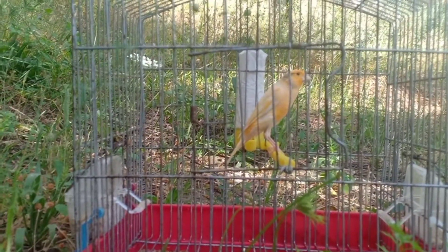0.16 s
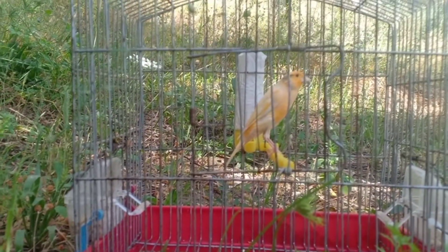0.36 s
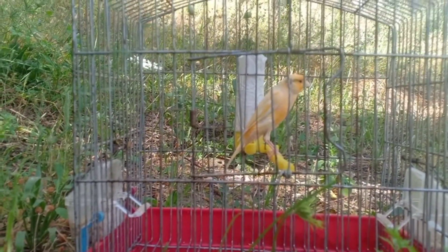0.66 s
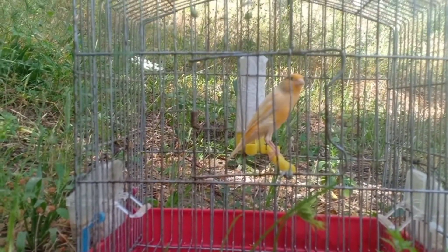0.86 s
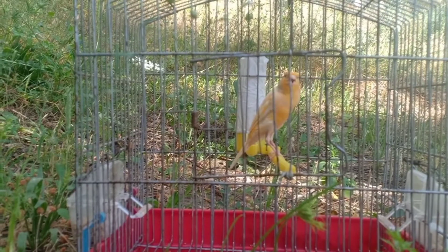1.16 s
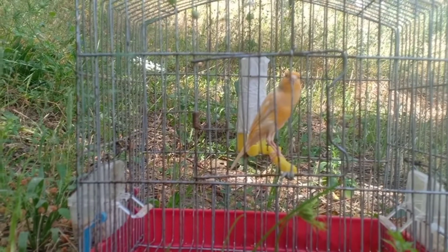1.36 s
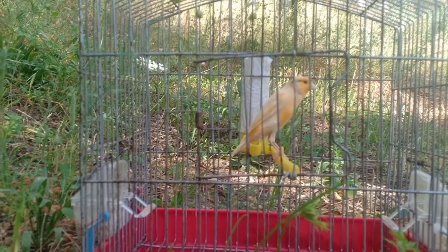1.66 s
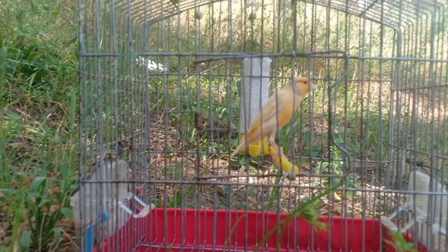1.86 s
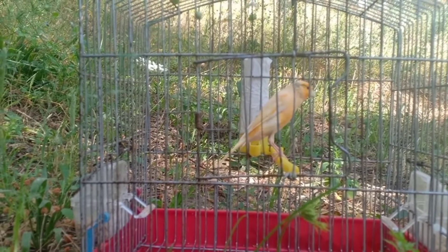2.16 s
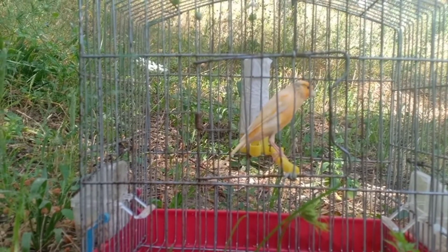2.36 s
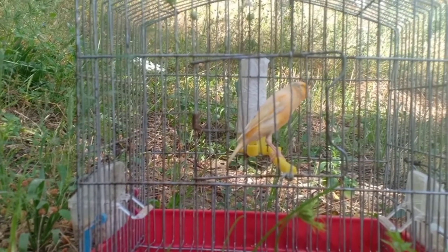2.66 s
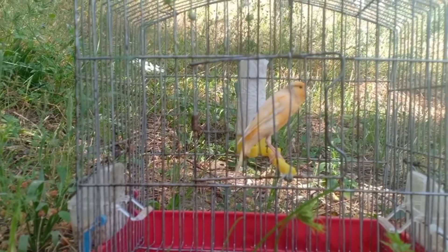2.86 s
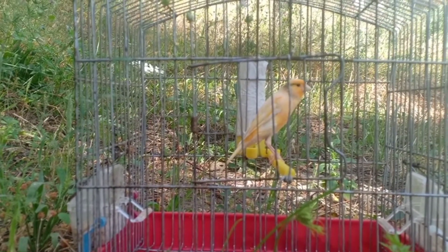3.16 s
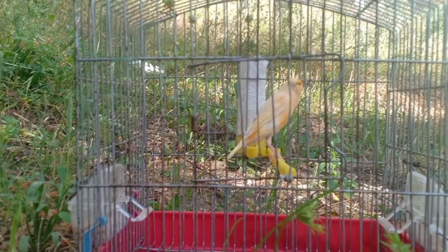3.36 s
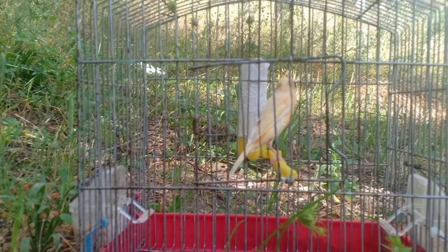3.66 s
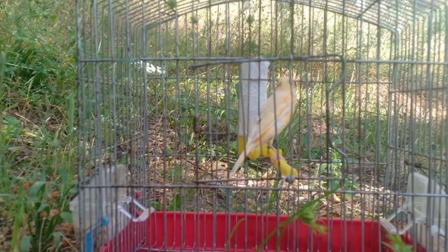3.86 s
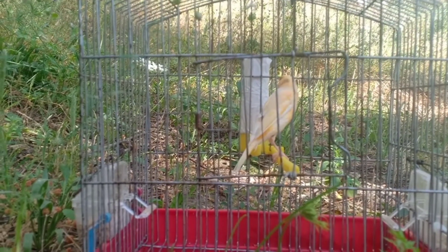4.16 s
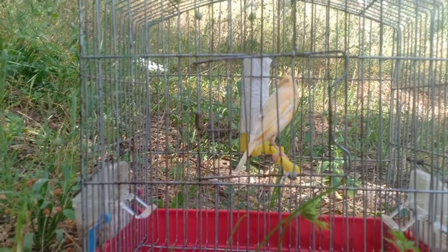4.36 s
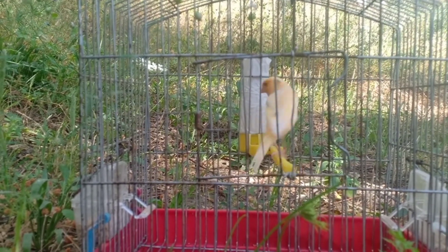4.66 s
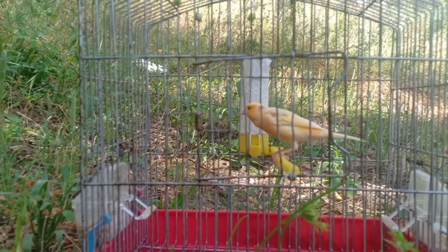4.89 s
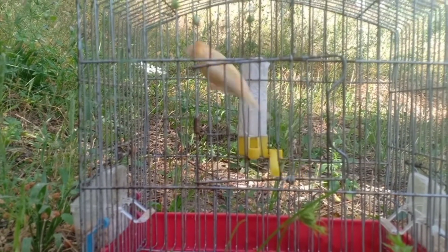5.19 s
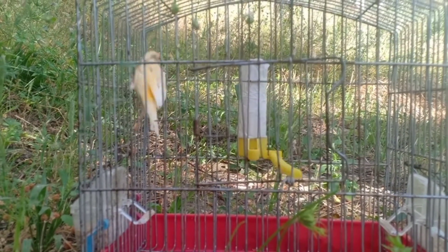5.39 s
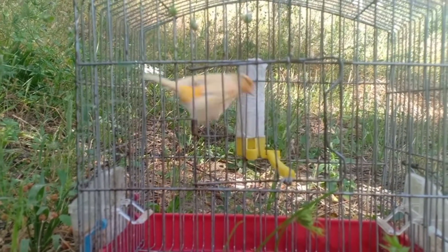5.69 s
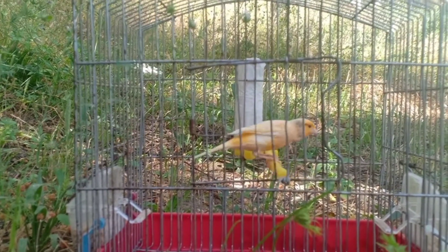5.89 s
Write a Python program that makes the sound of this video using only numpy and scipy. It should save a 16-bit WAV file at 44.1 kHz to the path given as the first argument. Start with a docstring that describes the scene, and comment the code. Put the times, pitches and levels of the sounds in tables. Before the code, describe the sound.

A caged canary gives three loud rising whistled calls outdoors while fainter wild birds chirp behind; late on it flutters, ringing the wire cage softly.

```python
"""A caged canary in a shady garden gives three rising calls, each going from a rasp to a clean whistle.
Each call is a gliding stack of harmonics plus throat hiss; the tray and the feeder throw short echoes.
Wild songbirds further off are bending near-sine tones blurred by echoes from the trees.
In the second half the canary flutters: shaped noise makes its feet ring the cage, its wings and its claws.
Under it all lie a faint outdoor rumble and a wash of far birdsong, also shaped noise."""
import sys
import numpy as np
from scipy import signal
from scipy.fft import rfft, irfft
from scipy.io import wavfile

SR = 44100
rng = np.random.default_rng(int(sys.argv[2]) if len(sys.argv) > 2 else 0)


def bounce(signal):
    """Save signal as a 16-bit WAV file at the path given by the first command-line argument."""
    frames = np.transpose(np.atleast_2d(signal))
    limited = np.clip(frames, -1, 1)
    pcm = np.round(limited * 32767).astype(np.int16)
    wavfile.write(sys.argv[1], SR, pcm)


N = 265923
TIME = np.arange(N) / SR
TOP_HZ = 15650

# Steady rumble and air: [f/Hz, relative level/dB]
AIR_SPECTRUM = [(12, -33.5), (20, -1.5), (32, -25.5), (49, -14), (80, -1.5), (153, -13), (238, -14),
                (298, -14.5), (549, -16), (1450, -23.5), (2920, -22), (3170, -30), (4550, -35.5),
                (5850, -35), (15500, -37.5)]
AIR_DB = -62.5
# Wash of far birdsong: [f/Hz, relative level/dB]
CHORUS_SPECTRUM = [(1500, -5), (2400, 2.5), (3500, -5.5), (5300, -0.5), (6800, -2.5), (8000, -9.5),
                   (11000, -36)]
# How loud that wash is over time, before a small sway: [t/s, level/dB]
CHORUS_LEVELS = [(0, -70), (.9, -73.5), (1.5, -69), (2.7, -67.5), (3.3, -69), (3.8, -76), (4.3, -74.5),
                 (6, -68)]
# Soft swells of low rumble: [t of crest/s, half width/s, level/dB]
RUMBLE_SWELLS = [(.38, 0.21, -62), (2.38, 0.19, -62.5)]
# Tone colour of the swells: [f/Hz, relative level/dB]
SWELL_SPECTRUM = [(80, -16), (200, 0), (450, -0.5), (800, -9.5), (1600, -29), (4000, -50)]

# Wild birds' notes, and at 0.16 s the echo of the first; level before the cut of WILD_DB:
# [t/s, length/s, start f/Hz, middle f/Hz, end f/Hz, level/dB, tone type]
WILD_SOUNDS = [(0.112, 0.052, 3860, 3020, 2370, -48.5, "chirp"),
               (0.16, 0.071, 2770, 2540, 2460, -52, "chirp"),
               (0.194, 0.25, 3720, 4690, 5150, -68.5, "whistle"),
               (0.273, 0.26, 2030, 2606, 3660, -60, "whistle"),
               (0.438, 0.026, 3000, 2730, 2210, -41.5, "chirp"),
               (0.468, 0.069, 2480, 2766, 2553, -54.5, "chirp"),
               (0.559, 0.052, 6150, 5160, 5500, -58, "twitter"),
               (0.701, 0.059, 6600, 4810, 3620, -58, "twitter"),
               (0.779, .028, 2220, 2570, 3060, -50, "chirp"),
               (0.923, .048, 3435, 2860, 2460, -48.5, "chirp"),
               (1.414, 0.082, 2650, 2435, 2700, -50, "chirp"),
               (1.566, 0.055, 2245, 2094, 1890, -61, "warble"),
               (1.576, 0.077, 4980, 4900, 4150, -56.5, "twitter"),
               (1.815, 0.039, 2420, 2880, 3130, -46.5, "chirp"),
               (1.94, 0.078, 4360, 4543, 4420, -47, "buzz"),
               (1.998, .016, 4960, 3210, 2530, -47.5, "chirp"),
               (2.195, .066, 2678, 2624, 2240, -44, "warble"),
               (2.275, 0.043, 2216, 2675, 2750, -45.5, "warble"),
               (2.352, 0.043, 2285, 2183, 2024, -46, "warble"),
               (2.438, 0.058, 3420, 3350, 3246, -53, "warble"),
               (2.467, 0.061, 3230, 3171, 2910, -45, "warble"),
               (2.712, 0.11, 3920, 3524, 3420, -66.5, "warble"),
               (4.958, .16, 1680, 1887, 1930, -54, "whistle"),
               (5.267, 0.177, 2434, 2407, 2390, -45, "whistle"),
               (5.605, .058, 2470, 2412, 2290, -46, "whistle"),
               (5.661, .13, 2390, 2270, 2380, -49, "whistle")]
# Tone types of the wild birds' sounds, by name: [left minus right level/dB, rasp 0-1]
WILD_TONES = {"chirp": (8, 0.98), "warble": (5, .28), "twitter": (-10, 1), "whistle": (7, 0.049),
              "buzz": (-2.5, 0.59)}
# High upward flicks, level before the cut of WILD_DB: [t/s, level/dB]
FLICK_TIMES = [(1.692, -57.5), (2.078, -57.5), (2.607, -59.5)]
FLICK_BEND_HZ, FLICK_S = (5200, 6300, 6680), 0.067  # start, middle and end pitch; length
# Arched syllables, level before the cut of WILD_DB: [t/s, level/dB]
ARCH_TIMES = [(4.391, -58), (4.565, -54), (4.742, -53), (4.94, -54), (5.156, -52.5)]
# The arch climbs from a low start to a sharp peak and drops to a lower end
ARCH_START_HZ, ARCH_PEAK_HZ, ARCH_END_HZ = 4064, 6800, 3350
ARCH_S, ARCH_PEAK_S, ARCH_WIDTH_S = 0.12, .054, 0.017
ARCH_PEAK_DIP_DB = -14.5  # the voice thins at the top
ARCH_HOOK_HZ, ARCH_HOOK_S = 376, .052  # the tail hooks up by this much, around this long after the peak
WILD_DB = -6.5  # applied to all wild birds and their echoes

# The canary's three calls, each: [t/s, f/Hz, level/dB]
FIRST_CALL = [(1.13, 994, -55), (1.158, 1314, -20), (1.168, 1442, -32), (1.194, 1567, -20),
              (1.234, 1944, -16), (1.298, 2336, -26), (1.324, 2430, -17.5), (1.35, 2753, -25),
              (1.408, 2974, -24), (1.444, 3394, -11.5), (1.458, 3474, -24.5)]
SECOND_CALL = [(2.884, 1185, -51), (2.908, 1330, -25.5), (2.93, 1514, -28.5), (2.948, 1505, -25.5),
               (2.964, 1767, -24.5), (2.994, 1968, -19.5), (3.038, 2315, -27), (3.052, 2400, -22),
               (3.07, 2664, -23), (3.138, 2952, -22), (3.166, 3012, -26), (3.175, 3003, -25.5)]
THIRD_CALL = [(5.213, 1063, -56.5), (5.225, 1158, -35), (5.239, 1400, -26), (5.251, 1484, -26),
              (5.269, 1554, -23), (5.319, 2012, -24), (5.371, 2390, -24), (5.419, 2760, -28),
              (5.463, 2928, -25.5), (5.499, 3165, -20), (5.515, 3205, -31.5), (5.524, 3240, -54)]
# Direct sound and close echoes for each pose of the bird: [left delay/ms, right delay/ms, left gain, right gain]
FIRST_PATHS = [(0, -.03, 1, 1), (.46, .35, .12, .09), (1.78, 1.81, .13, .13), (3.13, 3.12, .1, .1)]
SECOND_PATHS = [(0.0, 0.032, 1.0, 0.98), (0.46, 0.566, 0.21, 0.29), (0.86, 0.68, 0.2, 0.2),
                (1.85, 1.86, 0.32, 0.21)]
THIRD_PATHS = [(0.0, -0.049, 0.88, 1), (0.468, 0.296, 0.49, 0.28), (0.948, 1.03, 0.19, 0.12),
               (1.53, 1.483, 0.068, 0.4)]
# Strength of the first four harmonics from the syrinx, the bird's voice organ: [relative level/dB]
SYRINX_DB = [2.5, -1, -14.5, -5.5]
# How throat and beak pass those harmonics: [f/Hz, relative level/dB]
THROAT_FILTER = [(1100, -43.5), (1500, -31.5), (2080, -9.5), (2400, -21.5), (2750, -11), (3400, -1.5),
                 (4000, 2.5), (4500, -4.5), (5300, -2), (6000, -11), (7000, -29.5), (9000, -40)]
# Hiss of air in the throat: [f/Hz, relative level/dB]
THROAT_HISS = [(1100, -25.5), (2200, -12), (3300, -1), (5400, -2.5), (6300, -9), (7500, -23.5),
               (10000, -40.5)]
# Thin bright edge of the upper harmonics: [f/Hz, relative level/dB]
BRIGHT_EDGE = [(6000, -29), (7200, -11), (8500, -19.5), (10000, -22), (11400, -1.5), (12600, -17),
               (14000, -3.5), (15300, -2), (16000, -10), (17000, -91.5)]
# The tone builds up out of the hiss and stops abruptly
CALL_ATTACK_S, CALL_RELEASE_S = .018, .006
PURE_HZ, OCTAVE_FADE_LIMIT_DB = 2801, 28  # above this pitch the octave fades, by no more than this

# The canary's feet on perch and wires: [t/s, level/dB, time to ring down by 60 dB/s]
FOOT_LANDINGS = [(3.695, -60, 0.6), (4.892, -57.5, 0.99), (5.33, -54, 0.97), (5.46, -54.5, 1),
                 (5.608, -59.5, 1), (5.907, -51.5, 0.68)]
# What the cage rings with: [f/Hz, width/Hz, relative level/dB]
CAGE_RINGS = [(351, 22, 1), (401, 29, -2), (439, 39, 1.5), (517, 21, -0.5), (713.6, 38, -6.5),
              (797, 76, -8), (1246, 73, -9.5), (1790, 650, -14), (2625, 680, -29)]
# Wing flurries: [t/s, length/s, level/dB]
WING_FLURRIES = [(4.882, 0.038, -61), (5.308, 0.33, -57.5), (5.779, 0.074, -53), (5.904, 0.14, -63.5)]
# Rustle of the feathers: [f/Hz, relative level/dB]
FEATHER_SPECTRUM = [(120, -7), (400, 4), (1000, 0), (2200, 5.5), (5000, -5), (9000, -22), (14500, -12)]
# Claws tapping the bars: [t/s, level/dB]
CLAW_TAPS = [(3.695, -64), (4.89, -62), (5.814, -49), (5.833, -37), (5.837, -50), (5.91, -51)]
# Tone colour of the claws: [f/Hz, relative level/dB]
CLAW_SPECTRUM = [(150, 2), (900, -3), (2300, 0), (4500, -3), (7000, -16), (10000, -24), (15000, -19)]
# Dull knock of the tray: [f/Hz, relative level/dB]
THUMP_SPECTRUM = [(70, -20), (170, -2), (300, -7), (900, -20), (3000, -52)]
THUMP_AT_S, THUMP_DB, THUMP_T60_S = 5.815, -51.5, 0.21


def undb(db):
    """Turn decibels into gain."""
    return 10 ** (np.asarray(db) / 20)


def unit(x):
    """Scale to an rms (average strength) of 1."""
    return x / np.sqrt(np.mean(x ** 2))


def response(points, hz):
    """Read the gain at hz from a list of frequency and decibel points."""
    f, db = np.transpose(points)
    return undb(np.interp(np.log(hz + 1), np.log(f), db))


def noise(gain, size, apart=0.37):
    """Stereo noise shaped by gain(Hz); the two sides differ less in the bass."""
    hz = np.fft.rfftfreq(size, 1 / SR)
    mid, side = rfft(rng.standard_normal((2, size))) * gain(hz)
    side = side * apart * response([(60, -14.5), (600, 0.0)], hz)
    return unit(irfft(np.array([mid + side, mid - side]), size))


def coloured_noise(points, size, apart=0.37):
    """Stereo noise whose spectrum follows a table of points."""
    return noise(lambda hz: response(points, hz), size, apart)


def wobble(rate_hz, size):
    """Smooth random motion of spread 1, mostly slower than rate_hz."""
    hz = np.fft.rfftfreq(size, 1 / SR)
    return unit(irfft(rfft(rng.standard_normal(size)) / (1 + (hz / rate_hz) ** 4), size))


def decay(t, t60):
    """Fade that falls by 60 dB in t60 seconds."""
    return np.exp(-np.log(1000) * t / t60)


def left_right(db):
    """Two gains that make the left side louder than the right by db."""
    return undb(np.array([[db], [-db]]) / 2)


def add(track, start, sound):
    """Mix a sound into the track at its start time."""
    i = max(int(start * SR), 0)
    track[:, i:i + sound.shape[-1]] += sound[..., :N - i]


def garden(x, t60, wet_db):
    """Blur a sound with a dying tail of many small echoes, different at each ear."""
    t = np.arange(int(.8 * SR)) / SR
    tail = rng.standard_normal((2, len(t))) * decay(t, t60) * (t > .004)
    tail /= np.sqrt(np.sum(tail ** 2, axis=1, keepdims=True))
    mono = x.mean(axis=0)[None]
    return undb(wet_db) * signal.fftconvolve(mono, tail, axes=1)[:, :N]


def outdoors():
    """Low rumble and air that sway slightly, with a wash of far birdsong, all as shaped noise."""
    air_db = AIR_DB + .7 * wobble(3, N)
    air = coloured_noise(AIR_SPECTRUM, N, apart=0.82) * undb(air_db)
    chorus_db = np.interp(TIME, *np.transpose(CHORUS_LEVELS)) + 0.86 * wobble(8, N)
    chorus = coloured_noise(CHORUS_SPECTRUM, N, apart=0.76) * undb(chorus_db)
    return air + chorus


def swells():
    """Low rumbling noise rises softly and sinks again."""
    level = sum(undb(db) * np.exp(-((TIME - crest) / width) ** 2) for crest, width, db in RUMBLE_SWELLS)
    return level * coloured_noise(SWELL_SPECTRUM, N, apart=0.28)


def whistle(hz, rasp):
    """A near-sine bird tone whose pitch and strength shake with the rasp."""
    shaky_hz = hz * (1 + .06 * rasp * wobble(150, len(hz)))
    phase = 2 * np.pi * np.cumsum(shaky_hz) / SR
    return np.sqrt(2) * np.sin(phase) * (1 + .5 * rasp * wobble(140, len(hz)))


def bent_tone(length, bend, db, tone_type):
    """One tone that swells and fades while its pitch bends through start, middle and end."""
    pan_db, rasp = WILD_TONES[tone_type]
    u = np.linspace(0, 1, int(length * SR))
    hz = np.polyval(np.polyfit([0, .5, 1], bend, 2), u)
    swell = np.abs(np.sin(np.pi * u)) ** 0.48
    return whistle(hz, rasp) * swell * undb(db) * left_right(pan_db)


def arch():
    """One syllable whose pitch climbs to a sharp peak, where it thins, and drops to a weaker, hooked tail."""
    t = np.arange(0, ARCH_S, 1 / SR) - ARCH_PEAK_S
    height = np.exp(-np.abs(t / ARCH_WIDTH_S) ** 1.3)
    hook = 1 - 1 / (1 + (t / ARCH_HOOK_S) ** 8)
    foot_hz = np.where(t < 0, ARCH_START_HZ, ARCH_END_HZ + ARCH_HOOK_HZ * hook)
    hz = foot_hz + (ARCH_PEAK_HZ - foot_hz) * height
    level = undb(ARCH_PEAK_DIP_DB * height ** 2 - 8.5 * hook)
    return whistle(hz, rasp=0.113) * level * signal.windows.tukey(len(t), .2)


def wild_birds():
    """Curved notes and one early echo, high flicks and a repeated arch, blurred by echoes from the trees."""
    out = np.zeros((2, N))
    for start, length, *bend, db, tone_type in WILD_SOUNDS:
        add(out, start, bent_tone(length, bend, db, tone_type))
    for start, db in FLICK_TIMES:
        add(out, start, bent_tone(FLICK_S, FLICK_BEND_HZ, db, "twitter"))
    for start, db in ARCH_TIMES:
        add(out, start, arch() * undb(db))
    trees = garden(out, t60=.3, wet_db=-1) + garden(out, t60=1.0, wet_db=-10)
    return undb(WILD_DB) * (out + trees)


def throat_shares(hz, fade_db_per_hz):
    """The throat shares the strength among four harmonics; the octave fades as the pitch gets high."""
    shares = [undb(db) * response(THROAT_FILTER, k * hz) for k, db in enumerate(SYRINX_DB, 1)]
    octave_fade_db = np.clip(fade_db_per_hz * (hz - PURE_HZ), 0, OCTAVE_FADE_LIMIT_DB)
    shares[1] = shares[1] * undb(-octave_fade_db)
    return np.array(shares) / np.linalg.norm(shares, axis=0)


def through_paths(sound, paths):
    """Delay and scale a sound for each ear along the direct path and the close echoes."""
    size = 2 * len(sound)
    turn = -2j * np.pi * np.fft.rfftfreq(size, 1 / SR) / 1000  # per millisecond of delay
    ears = sum(np.array([gl * np.exp(turn * left), gr * np.exp(turn * right)])
               for left, right, gl, gr in paths)
    return irfft(rfft(sound, size) * ears, size)


def bright_edge(t, hz, phase, rough=0.82, hiss=.4, hiss_s=0.14, spread=0.24):
    """The upper harmonics start in hiss and flicker, each on its own."""
    edge = hiss / (1 + (t / hiss_s) ** 4) * coloured_noise(BRIGHT_EDGE, len(t))
    for k in range(3, 14):
        flicker = 1 + rough * wobble(220, len(t))
        # the bars push the two sides slightly out of step
        skew = spread * wobble(60, len(t)) * np.array([[1], [-1]])
        harmonic = np.sin(k * phase + k * k + skew)
        edge += response(BRIGHT_EDGE, k * hz) * min(1, 6 / k) * flicker * harmonic
    return edge


def canary_call(rows, paths, rasp_s, fade_db_per_hz, edge_db,
                rasp=.28, flutter=0.5, shimmer=.035, jitter=0.0024, onset_jitter=0.016,
                hiss_db=-35, onset_hiss_db=-22, edge_pan_db=-3):
    """A rising glide through the throat; the syrinx rattles, then settles after about rasp_s seconds."""
    s, *columns = np.transpose(rows)
    t = np.arange(s[0], s[-1], 1 / SR)
    since_start = t - s[0]
    hz, level_db = (np.interp(t, s, column) for column in columns)
    strength = undb(level_db) * np.minimum(1, (s[-1] - t) / CALL_RELEASE_S)
    shares = throat_shares(hz, fade_db_per_hz)
    unsettled = 1 / (1 + (since_start / rasp_s) ** 4)
    hz = hz * (1 + (jitter + onset_jitter * unsettled) * wobble(230, len(t)))
    phase = 2 * np.pi * np.cumsum(hz) / SR
    voiced = np.minimum(1, since_start / CALL_ATTACK_S)
    tone = voiced * sum(share * np.sin(k * phase + k * k) for k, share in enumerate(shares, 1))
    # the membranes beat against each other, unevenly around 170 Hz, until they settle
    beat_hz = 170 * (1 + 0.51 * wobble(62, len(t)))
    beat = np.sin(2 * np.pi * np.cumsum(beat_hz) / SR)
    tremble = (shimmer + rasp * unsettled) * wobble(360, len(t))
    shake = np.sqrt(2) * (1 + tremble + flutter * unsettled * beat)
    # air hisses through the throat, most at the start; part of it follows the octave
    hiss_level = undb(hiss_db) * shares[1] + undb(onset_hiss_db) * unsettled + 1 - voiced
    hiss = hiss_level * coloured_noise(THROAT_HISS, len(t))[0]
    out = through_paths(strength * (tone * shake + hiss), paths)
    # the edge grows with effort and beams straight from the beak, past the close echoes
    effort = undb(edge_db + .6 * level_db) * signal.windows.tukey(len(t), .08)
    edge = bright_edge(since_start, hz, phase)
    out[:, :len(t)] += edge * effort * shake * left_right(edge_pan_db)
    return out


def canary():
    """Three calls, scattered a little by the bars and the ground, with a faint tail from the trees."""
    out = np.zeros((2, N))
    calls = [canary_call(FIRST_CALL, FIRST_PATHS, rasp_s=.036, fade_db_per_hz=0.17, edge_db=-37),
             canary_call(SECOND_CALL, SECOND_PATHS, rasp_s=0.038, fade_db_per_hz=0.07, edge_db=-40.5),
             canary_call(THIRD_CALL, THIRD_PATHS, rasp_s=0.073, fade_db_per_hz=1.5, edge_db=-36.0)]
    for rows, call in zip((FIRST_CALL, SECOND_CALL, THIRD_CALL), calls):
        add(out, rows[0][0], call)
    bars = garden(out, t60=.025, wet_db=-20)
    trees = garden(out, t60=.4, wet_db=-30.5)
    return out + bars + trees


def cage_gain(hz):
    """The wire cage answers most strongly at its own ringing frequencies."""
    return sum(undb(db) / (1 + (2 * (hz - f) / width) ** 2) for f, width, db in CAGE_RINGS)


def fluttering(beat_hz=24):
    """Feet set the cage ringing, wings rustle once a beat, claws tick on the bars."""
    out = np.zeros((2, N))
    t = TIME[:SR]
    for start, db, t60 in FOOT_LANDINGS:
        ring = decay(t, t60) * (1 - np.exp(-t / .006))
        add(out, start, undb(db) * ring * noise(cage_gain, len(t), apart=0.28))
    for start, length, db in WING_FLURRIES:
        size = int(length * SR)
        beats = signal.windows.tukey(size, .5) * (1 + .5 * np.sin(2 * np.pi * beat_hz * t[:size]))
        add(out, start, undb(db) * beats * coloured_noise(FEATHER_SPECTRUM, size, apart=1.0))
    tick = decay(t, .011)
    for start, db in CLAW_TAPS:
        add(out, start, undb(db) * tick * coloured_noise(CLAW_SPECTRUM, len(t), apart=0.53))
    return out


def thump():
    """A dull knock of the tray among the hardest claw taps: low noise that dies away quickly."""
    t = TIME[:SR]
    out = np.zeros((2, N))
    knock = decay(t, THUMP_T60_S) * coloured_noise(THUMP_SPECTRUM, len(t))
    add(out, THUMP_AT_S, undb(THUMP_DB) * knock)
    return out


def scene():
    """Everything at the two microphones."""
    return outdoors() + swells() + wild_birds() + canary() + fluttering() + thump()


def record(dry):
    """Cut everything above TOP_HZ steeply."""
    return signal.sosfilt(signal.ellip(10, .2, 70, TOP_HZ, fs=SR, output="sos"), dry)


dry = scene()
out = record(dry)
bounce(out)
```